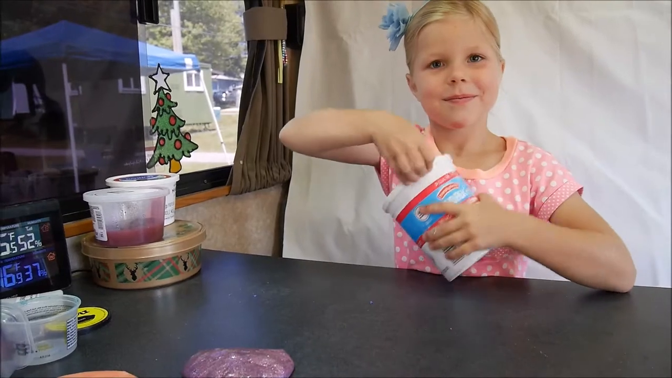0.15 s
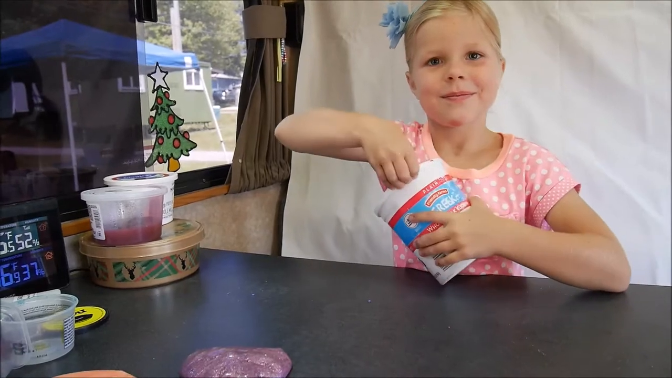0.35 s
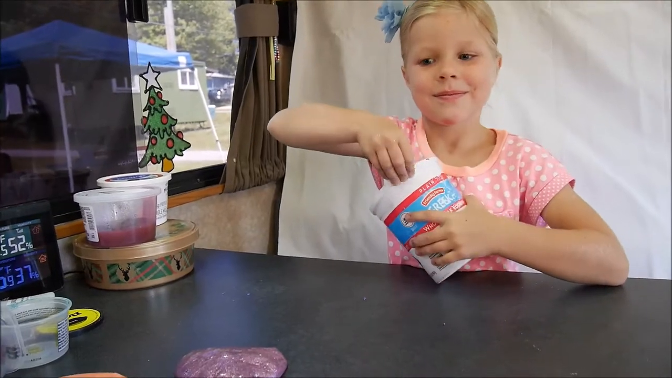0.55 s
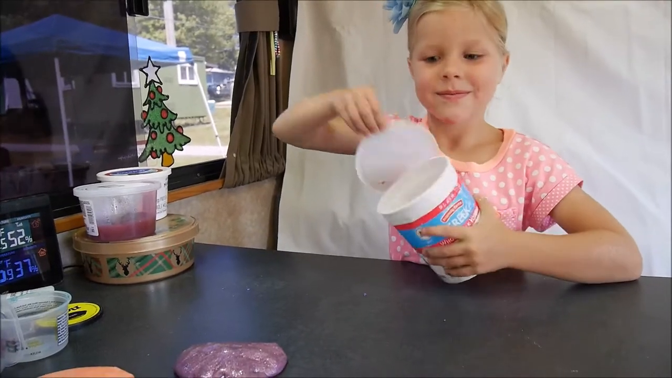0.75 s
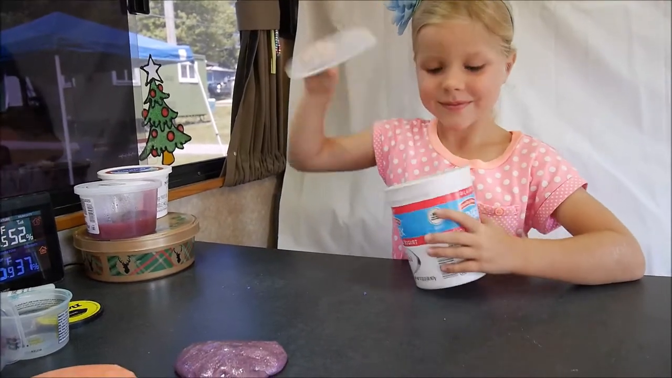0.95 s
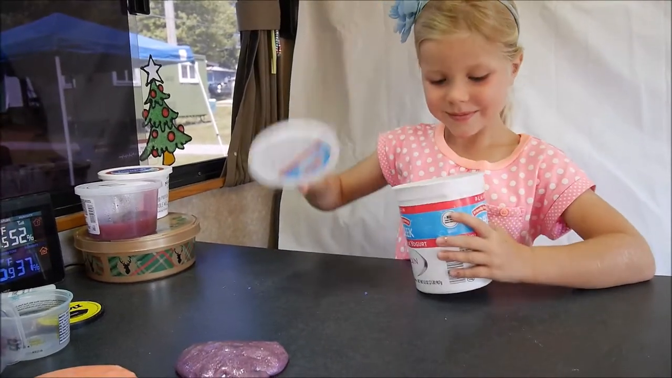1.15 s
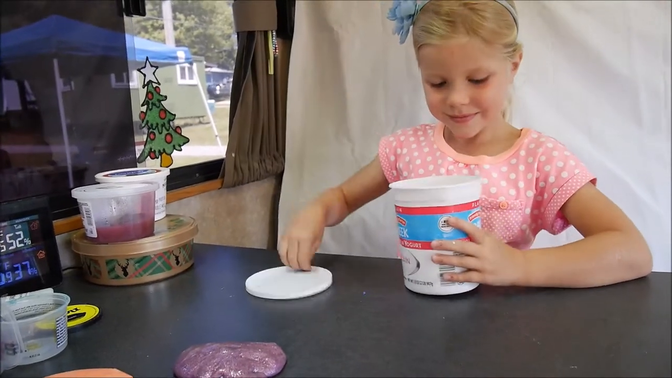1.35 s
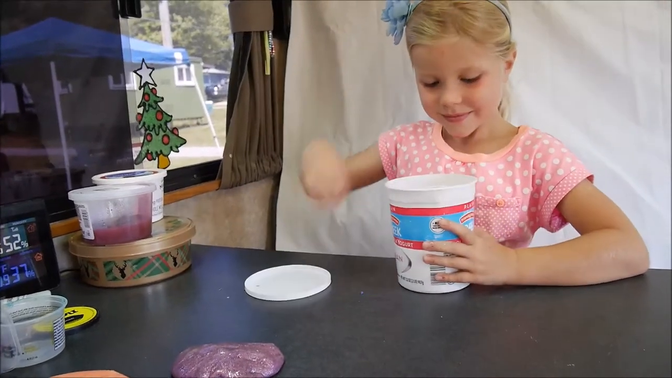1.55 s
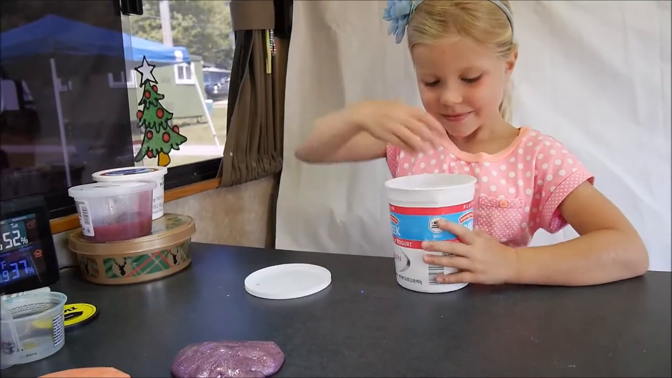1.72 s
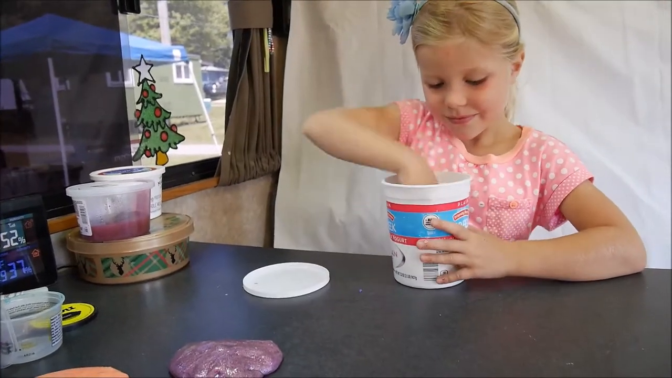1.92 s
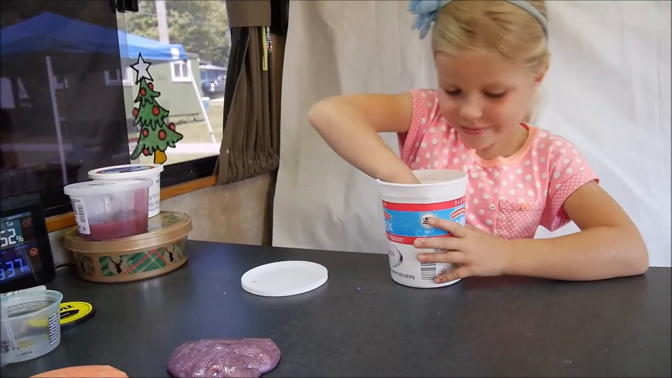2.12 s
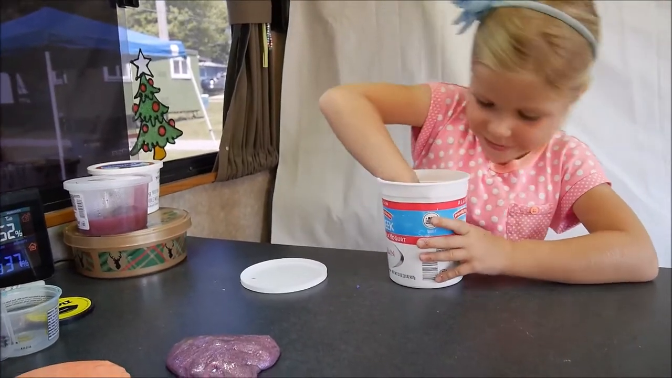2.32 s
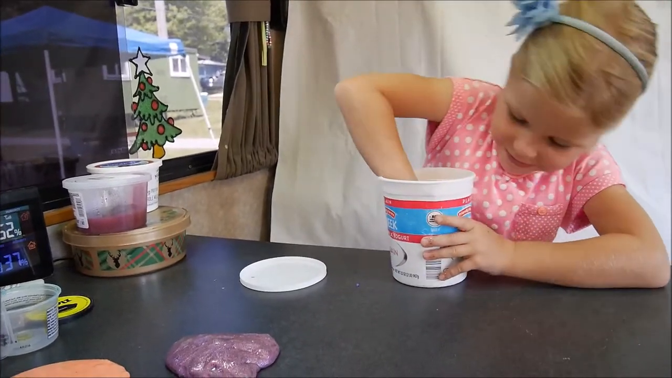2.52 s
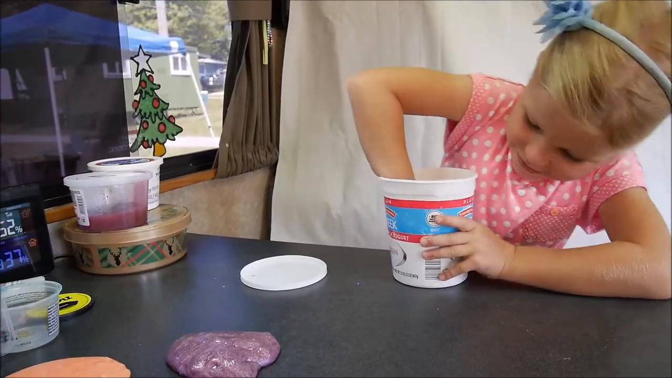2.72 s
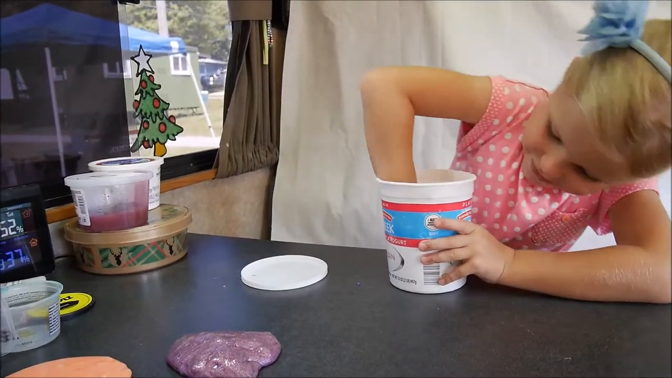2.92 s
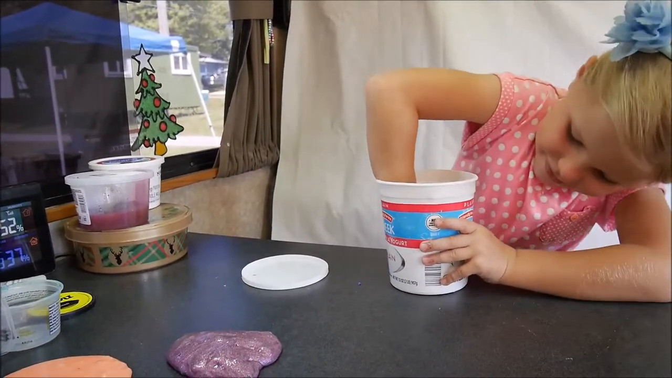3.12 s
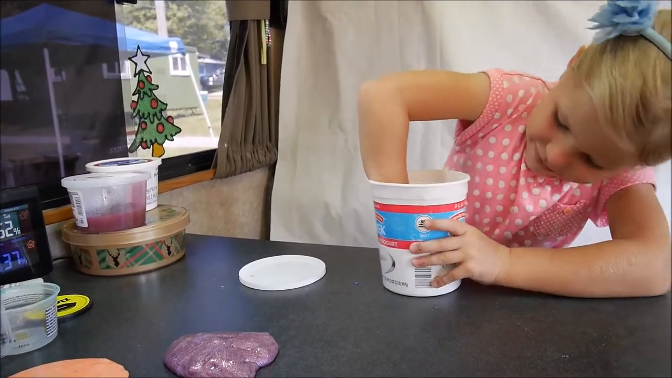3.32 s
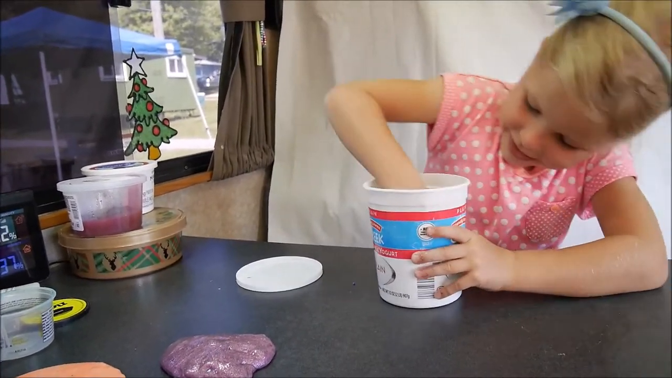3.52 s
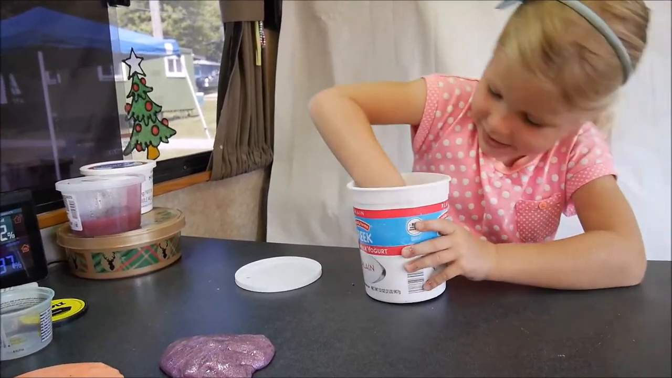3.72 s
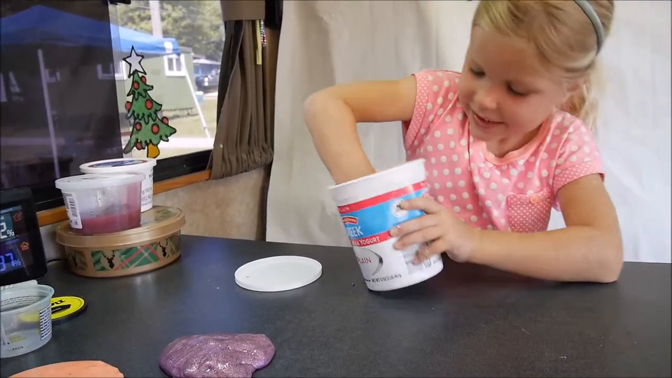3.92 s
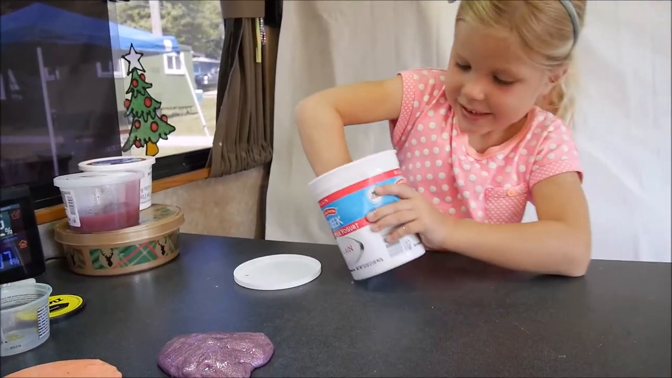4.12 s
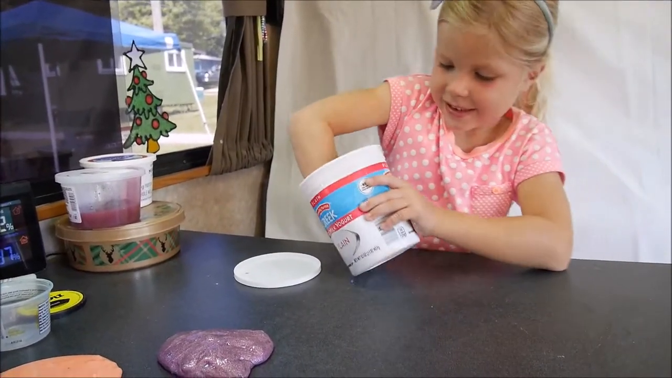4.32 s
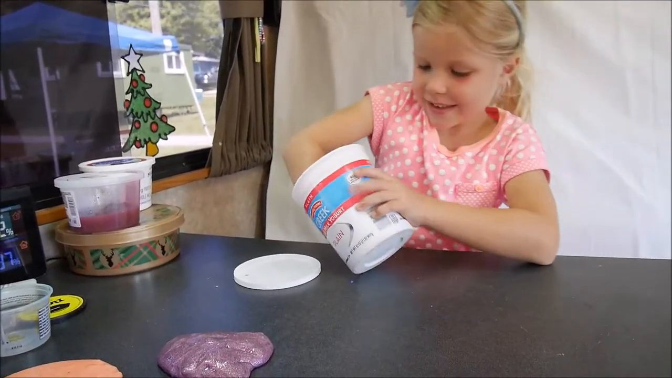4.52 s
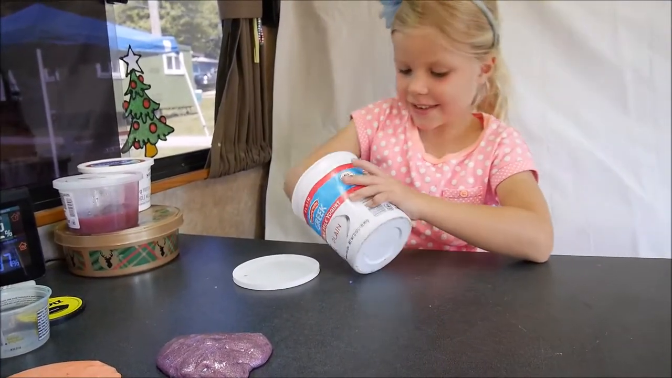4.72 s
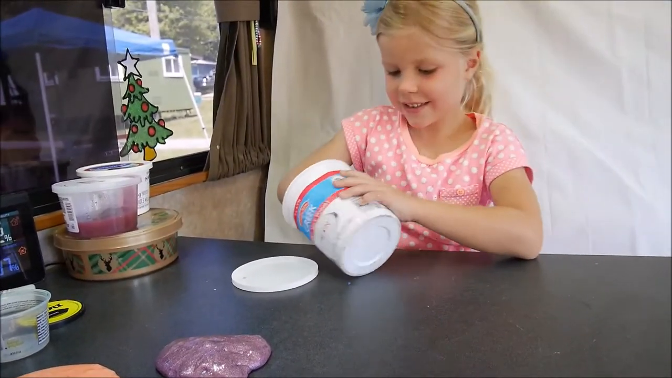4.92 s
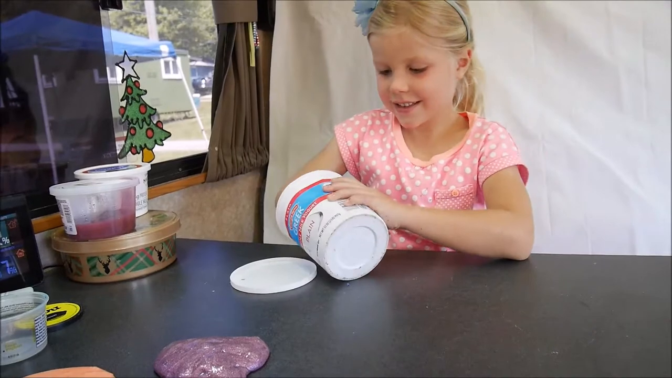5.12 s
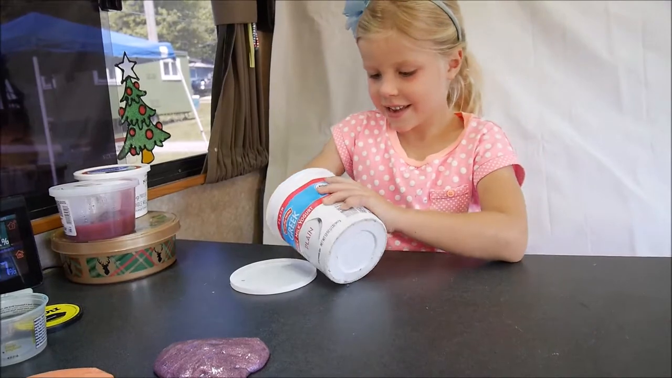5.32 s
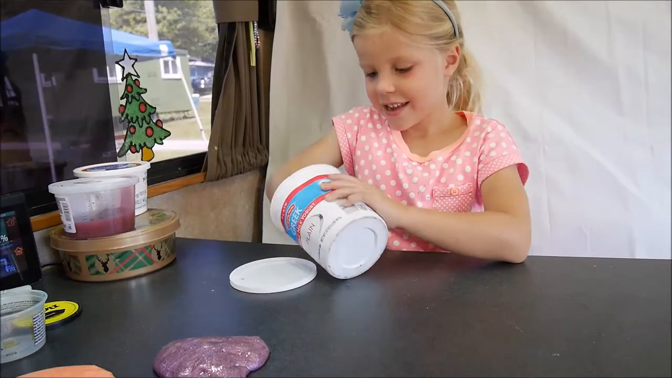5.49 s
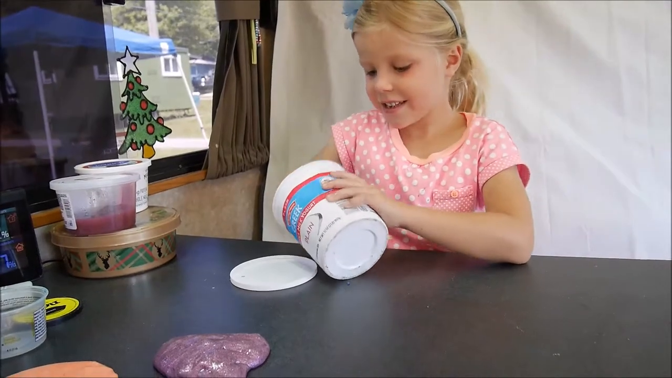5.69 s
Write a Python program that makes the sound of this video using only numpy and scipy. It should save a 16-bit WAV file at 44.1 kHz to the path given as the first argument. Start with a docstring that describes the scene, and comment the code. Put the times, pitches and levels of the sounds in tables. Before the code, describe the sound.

Close, dry indoor handling of a lightweight plastic container: a few loud hollow cracks as the lid is prised loose, a bright flick, a short flat clatter as it lands, then quieter skin-on-plastic rustling, scattered clicks, a dull base knock and short scrapes. A last muffled double knock comes near the end. Faint steady air noise stays underneath, with nearly centred sound and little reverberation.

```python
"""In a small, dead room a thin plastic tub is handled at a table, about a metre from the microphone.
Its lid is prised off in a few snaps, flicks free and drops on the table: damped modes ring under noise cracks.
A hand rubs along the wall in filtered grains of noise, among short bright ticks of resonant noise.
The base scrapes in wandering stick-slip tones, knocks and is tipped over; low bumps are damped sines.
Under it all lies a low ventilation rush of coloured noise."""
import sys
import numpy as np
from scipy import signal
from scipy.fft import rfft, irfft, next_fast_len
from scipy.io import wavfile
from scipy.ndimage import uniform_filter1d

SR = 44100
rng = np.random.default_rng(int(sys.argv[2]) if len(sys.argv) > 2 else 0)


def wrap_up_sound(samples):
    """Save the sound to the file named by the first command line argument, as 16-bit audio."""
    columns = np.atleast_2d(samples).T
    # keep every value between -1 and 1, then stretch to whole-number steps
    tamed = np.clip(columns, -1, 1)
    steps = np.round(tamed * 32767).astype(np.int16)
    wavfile.write(sys.argv[1], SR, steps)


N = 258117
T = np.arange(N) / SR
RING_T = T[:SR // 3]  # time axis of one blow or echo tail [s]

# ventilation spectrum: (frequency [Hz], relative level [dB])
AIR_SPECTRUM = [(15, -32), (25, -50), (75, -29.5), (102, -10), (285, -1.5), (363, -1), (516, -5),
                (560, -15.5), (624, -13.5), (818, -18.5), (962, -23.5), (2480, -33.5), (4370, -34),
                (6380, -40.5), (14400, -45.5), (16000, -63)]
AIR_DB = -45
# side signal of the ventilation: (frequency [Hz], gain [dB])
AIR_SIDE = [(30, 21), (100, -16.5), (400, -20.5), (1000, 5), (3000, 1), (12000, -3.5)]

# side signal of the room's tail: (frequency [Hz], gain [dB])
ROOM_SIDE = [(200, -18), (500, -12), (1000, -7), (3000, -4.5), (12000, -1.5)]
# reflections from the table and near walls: (delay [s], level [dB])
EARLY_ECHOES = [(.0031, -13.5), (.0049, -17.5), (0.0111, -16.5)]
ROOM_T60_S, TOP_HZ = 0.17, 15700

# dull bumps of arm, lid and tub: (time [s], level [dB], frequency [Hz])
BUMPS = [(0.449, -27, 182), (0.705, -29, 157), (1.454, -31, 167), (1.707, -26, 137), (3.331, -29.5, 127),
         (3.571, -28, 148)]

# a fingertip's glide: (start [s], let go [s])
SWISH_S, SWISH_DB = (5.805, 5.85), -37.5

# the base judders over the table: (start [s], end [s], level [dB], ringing frequency [Hz])
BASE_SCRAPES = [(3.448, 3.51, -23, 680), (3.734, 3.787, -38, 658), (5.04, 5.079, -40.5, 634),
                (5.514, 5.561, -31.5, 611.5)]
SCRAPE_CREST = 0.67  # share of its length at which a drag is strongest

# short bright ticks of nails and plastic edges, some of them the sharp edge of a wall snap:
# (time [s], tick level [dB], centre frequency [Hz], wall level [dB])
BRIGHT_TICKS = [(0.037, -33, 3550, -51), (0.7032, -4.5, 4200, -46), (1.087, -25, 3630, -65),
                (1.9226, -47, 11200, -65), (2.200, -36, 9100, -65), (2.682, -32, 2500, -43),
                (2.7745, -16, 2860, -51), (3.0745, -23, 5000, -40.5), (3.29, -33, 6540, -38.5),
                (3.4307, -20, 3500, -37), (4.5242, -32, 2200, -42.5), (4.555, -30.5, 5400, -60),
                (4.5782, -28, 3660, -39), (4.640, -46, 3000, -42), (4.674, -31, 4450, -46),
                (4.751, -13, 6100, -60), (4.8819, -31, 4940, -50), (5.054, -24, 3040, -43),
                (5.1406, -19, 3940, -40), (5.4166, -28.5, 2940, -48)]
# modes in the middle of the wall, rung by a light touch: (frequency [Hz], level [dB], t60 [s])
TOUCH_MODES = [(566, -3, 0.13), (700, 5, 0.052), (970, -3, 0.018), (1075, -9.5, 0.038)]
# fainter ticks at random moments: density, base level, middle frequency, spread either way
STRAY_PER_S, STRAY_DB, STRAY_HZ, STRAY_OCTAVES = 4, -44, 6300, 1

# strokes of skin on plastic: (start [s], let go [s], rub weight [dB], hiss weight relative to rub [dB])
SKIN_STROKES = [(0.934, 1.121, -48.5, -7.5), (1.317, 1.405, -51, -8), (2.04, 2.133, -52, -6),
                (2.23, 2.293, -49.5, -7.5), (2.49, 2.628, -52.5, -12), (2.798, 2.876, -41, -11.5),
                (2.86, 3.05, -41.5, -10), (3.149, 3.36, -47.5, -6.5), (3.387, 3.456, -40, -8),
                (3.412, 3.486, -34.5, -4), (3.568, 3.623, -43, -3), (3.642, 3.768, -38.5, -1.5),
                (3.957, 4.027, -43.5, -10), (4.026, 4.224, -48.5, -7), (4.56, 4.744, -52, -6),
                (4.89, 4.966, -50, -9.5), (5.024, 5.057, -39, -9), (5.11, 5.142, -46.5, -9),
                (5.282, 5.343, -49, -16), (5.425, 5.52, -50, -14), (5.502, 5.541, -39.5, -5.5),
                (5.815, 5.86, -44, -6)]
# brushing between strokes: (start [s], end [s], rub weight [dB], hiss weight relative to rub [dB])
HAND_BRUSH = (1.06, 6.5, -62.5, -3.5)
# linear press-in time, easing during the slide, time constant of the lift
PRESS_S, EASE_DB_PER_S, LIFT_S = 0.039, 7, 0.026
# the rub as coloured by the tub: (frequency [Hz], gain [dB])
RUB_SPECTRUM = [(250, -10.5), (500, 8.5), (680, 15.5), (950, 8.5), (1300, -4), (1700, 0), (2200, 0),
                (2700, 0), (3700, -2.5), (4800, -6), (6500, -7), (10000, -24)]
# the fine hiss of skin: (frequency [Hz], gain [dB])
HISS_SPECTRUM = [(3000, -30), (5500, -26), (6800, -33), (7900, 9), (9500, 21.5), (12000, 16), (14500, 10),
                 (16000, -52)]

# the base knocks on the table: (time [s], ring level [dB], contact cutoff [Hz],
# pitch factor [ratio], crack level [dB], crack tilt [dB/octave])
BASE_KNOCKS = [(3.3295, -35, 690, 1.16, -35.5, 5), (3.5708, -12.5, 690, 0.99, -28, -1.5),
               (3.7205, -29.5, 1200, 1.04, -32.5, 8.5), (5.6935, -20.5, 2550, 1.29, -16.5, -8.5)]
# modes of the base: (frequency [Hz], level [dB], t60 [s])
BASE_MODES = [(229, -4, 0.036), (330, -8, 0.072), (362, -7, 0.071), (564, 7, 0.031), (703, -5, 0.052),
              (780, -13, 0.12), (880, 0.5, 0.02), (1087, -3, 0.021), (1620, -47, 0.019), (1870, -11, 0.055),
              (2284, 3, 0.014), (3000, -25, 0.015)]
# the loose lid is struck: (time [s], ring level [dB], contact cutoff [Hz],
# pitch factor [ratio], crack level [dB], crack tilt [dB/octave])
LID_STRIKES = [(0.9142, -31, 5000, 1.1, -21, 4), (0.9238, -25.5, 9000, 1.16, -11, 1.5),
               (1.4201, -11, 6000, 1.0, -13, -3.5), (1.4250, -23.5, 5000, 1.0, -18.5, 6),
               (1.4490, -29, 4000, 0.83, -15.5, -5), (1.4522, -23, 5000, 1.2, -16.5, -2),
               (1.4580, -24.5, 5000, 1.0, -26, 5.5), (1.9845, -48.5, 3500, 0.91, -33.5, -3)]
# modes of the lid: (frequency [Hz], level [dB], t60 [s])
LID_MODES = [(222, -17, 0.12), (362, -8.5, 0.015), (488, -12, 0.048), (724, -10.5, 0.037), (940, -4, 0.015),
             (1636, -1, 0.014), (2170, -4, 0.042), (2420, -12, 0.019), (3200, -9.5, 0.035),
             (3430, -9, 0.054), (3690, -3, 0.033), (4220, -20, .035), (4800, -16, 0.027),
             (7360, -37, 0.022)]
# dense upper modes that crack in lid and base: (frequency [Hz], gain [dB])
LID_AND_BASE_CRACK = [(300, -11), (1000, -12.5), (1800, -10), (2800, 7), (3800, 7), (5000, 0.5),
                      (6500, -2.5), (8000, -5.5), (10000, -4.5), (13000, -8), (16000, -22)]
# the tub wall and rim snap: (time [s], wall level [dB], contact cutoff [Hz],
# pitch factor of the grip [ratio], crack level [dB], crack tilt [dB/octave])
WALL_SNAPS = [(0.2243, -26.5, 980, 0.96, -25.5, -6), (0.3252, -38, 700, 0.95, -28, -4),
              (0.4411, -8.5, 1190, 0.98, -7, 1), (0.4432, -16, 1180, 1.06, -26.5, -10.5),
              (0.4520, -7.5, 523, 0.96, -16, -6), (0.6715, -29.5, 694, 1.07, -41.5, -1),
              (0.7029, -14, 1510, 1.07, -11.5, 0.5), (0.7075, -16, 890, 1.12, -21, -5),
              (0.7185, -17, 674, 1, -28, -8), (0.7330, -19, 507, 1.03, -19.5, -5.5),
              (0.8850, -26, 800, 0.807, -19, -3), (0.9150, -33.5, 406, 0.72, -21, -4),
              (2.7735, -28, 700, 1.2, -17.5, -4), (4.7490, -54, 900, 1.2, -21, 1.5),
              (4.7530, -34, 900, 1.4, -20.5, -1.5), (5.6735, -19, 395, 1.03, -35, -0.5),
              (5.6925, -25, 290, 0.92, -25, -9.5)]
# modes of the wall: (frequency [Hz], level [dB], t60 [s])
WALL_MODES = [(217, -14.5, 0.071), (279, -3, 0.087), (318, -1.5, 0.033), (473, 3.5, 0.049),
              (539.4, -9, 0.15), (732, -8, 0.048), (890, -3, 0.032), (980, -5, 0.068), (1182, -18.5, 0.054),
              (1650, -12.5, 0.031)]
# dense upper modes that crack in the rim: (frequency [Hz], gain [dB])
RIM_CRACK_SPECTRUM = [(300, 8), (1000, 3), (1600, -2.5), (2200, -0.5), (3400, 1.5), (4350, 3.5),
                      (5400, 0.5), (6400, 0.5), (7800, -6), (9200, -1), (11500, -6.5), (14500, -14),
                      (16000, -33)]


def undb(db):
    """Level: an amplitude gain is ten to the power of decibels over twenty."""
    return 10 ** (np.asarray(db) / 20)


def unit(x):
    """Normalization: a signal divided by its rms has rms 1."""
    return x / np.sqrt(np.mean(x ** 2))


def add(track, s, sound):
    """Superposition: pressures sum, here from time s onward."""
    i = int(s * SR)
    track[i:i + len(sound)] += sound[:len(track) - i]


def colour(x, points, tilt_db=0):
    """Minimum phase: a magnitude curve, tilted about 4 kHz, fixes a causal filter through its cepstrum."""
    size = 2 * next_fast_len(len(x))
    octave = np.log2(np.maximum(np.fft.rfftfreq(size, 1 / SR), 20))
    hz, db = np.transpose(points)
    curve_db = np.interp(octave, np.log2(hz), db)
    # the tilt stays constant below 1 kHz
    tilt = tilt_db * np.maximum(octave - np.log2(4000), -2)
    cepstrum = irfft(np.log(undb(curve_db + tilt)))
    # folding the negative times onto the positive ones makes the filter causal
    cepstrum[1:size // 2] *= 2
    cepstrum[size // 2 + 1:] = 0
    return irfft(rfft(x, size) * np.exp(rfft(cepstrum)))[:len(x)]


def resonate(x, hz, width_hz):
    """Resonance: a single damped mode passes a band about its centre, where its gain is 1."""
    b, a = signal.iirpeak(min(hz, .45 * SR), hz / width_hz, fs=SR)
    return signal.lfilter(b, a, x)


def fade(t60):
    """Damping: free vibration decays exponentially, by 60 dB in t60 seconds."""
    return undb(-60 * RING_T / t60)


def burst(t60):
    """Modal overlap: many modes too close to tell apart act as decaying noise."""
    return rng.standard_normal(len(RING_T)) * fade(t60)


def walk(rate):
    """Random modulation: smoothed random steps vary slowly, with rms 1."""
    k = int(SR / rate)
    steps = np.repeat(rng.standard_normal(N // k + 1), k)
    return unit(uniform_filter1d(steps, k)[:N])


def grains(rate, spread_db):
    """Stick-slip friction: tiny slips of uneven size fall at random moments, rate per second."""
    moments = rng.random(N) < rate / SR
    return moments * rng.standard_normal(N) * undb(spread_db * rng.standard_normal(N))


def stereo(mid, side, width):
    """Sum and difference: an independent, coloured side signal sets the width at each frequency."""
    side = colour(side, width)
    return np.array([mid + side, mid - side])


def ventilation():
    """Flow noise: turbulence gives a steady low rush, with a broad hum and a fainter low drone."""
    mid, side = (unit(colour(rng.standard_normal(N), AIR_SPECTRUM)) for _ in range(2))
    rush = undb(AIR_DB) * stereo(mid, side, AIR_SIDE)
    hum = undb(-49.5) * unit(resonate(rng.standard_normal(N), hz=331.6, width_hz=15.0))
    drone = undb(-62) * unit(resonate(rng.standard_normal(N), hz=110, width_hz=22))
    return rush + hum + drone


def room(x, low_db, high_db, pan_db):
    """Reverberation: direct sound and early echoes precede a short diffuse tail, new at every call."""
    early = np.zeros(len(RING_T))
    early[0] = 1  # direct sound
    for s, db in EARLY_ECHOES:
        add(early, s, undb([db]))
    build_up = np.clip(RING_T / 0.00093 - .5, 0, 1)
    tails = [burst(ROOM_T60_S) * build_up for _ in range(2)]
    tail_curve = [(500, low_db), (2000, high_db)]
    mid, side = (colour(tail / np.linalg.norm(tail), tail_curve) for tail in tails)
    response = early + stereo(mid, side, ROOM_SIDE)
    pan = undb([[-pan_db / 2], [pan_db / 2]])  # positive leans right
    return signal.fftconvolve(x[None], response, axes=1)[:, :N] * pan


def thuds():
    """Damped oscillation: each bump gives a few low, quickly dying swings."""
    out = np.zeros(N)
    onset = 1 - np.exp(-RING_T / 0.0059)
    for s, db, hz in BUMPS:
        swing = np.sin(2 * np.pi * hz * RING_T) * fade(t60=0.079) * onset
        add(out, s, undb(db) * swing)
    return out


def stroke(start, let_go):
    """Contact force: a stroke presses in, eases as it slides and lifts off exponentially."""
    press = np.clip((T - start) / PRESS_S, 0, 1)
    ease = undb(-EASE_DB_PER_S * np.clip(T - start, 0, let_go - start))
    lift = np.exp(-np.maximum(T - let_go, 0) / LIFT_S)
    return press * ease * lift


def swish():
    """Sliding friction: a fingertip gliding over the smooth wall excites a thin, high hiss."""
    hiss = unit(resonate(rng.standard_normal(N), hz=11200, width_hz=4300))
    return undb(SWISH_DB) * stroke(*SWISH_S) * hiss


def scrapes():
    """Stick-slip: as the tub is dragged, the slips lock loosely to the base's drum mode."""
    out = np.zeros(N)
    for start, end, db, hz in BASE_SCRAPES:
        drag = np.interp((T - start) / (end - start), [0, SCRAPE_CREST, 1], [0, 1, 0])
        pressure = drag * undb(2 * walk(rate=90))
        phase = 2 * np.pi * np.cumsum(hz * (1 + 0.037 * walk(rate=210))) / SR
        # sudden slips add overtones
        judder = np.sin(phase) + 0.01 * np.sin(2 * phase) + 0.042 * np.sin(3 * phase)
        grit = unit(resonate(grains(rate=820, spread_db=5), hz, width_hz=76))
        out += undb(db) * pressure * (judder + .55 * grit)
    return out


def ringing(modes, contact_hz, grip):
    """Modal synthesis: a soft contact leaves high modes out; a tight grip raises every frequency."""
    hz, db, t60 = np.transpose(modes)
    gains = undb(db) / np.hypot(1, (hz * grip / contact_hz) ** 2)
    out = np.zeros(len(RING_T))
    for k, (gain, f, decay) in enumerate(zip(gains, hz, t60)):
        sign = (-1) ** k  # neighbouring modes move the radiating face in opposite directions
        out += sign * gain * np.sin(2 * np.pi * f * grip * RING_T) * fade(decay)
    return out


def tick(hz):
    """Impulsive excitation: a short burst of noise, coloured by one broad resonance, makes a bright click."""
    return resonate(burst(t60=0.0067), hz, .5 * hz)


def ticks():
    """Light impact: nails, edges and snaps tick with a little wall ring; faint stray ticks join the brushing."""
    out = np.zeros(N)
    for s, db, hz, wall_db in BRIGHT_TICKS:
        grip = 1 + 0.013 * rng.standard_normal()
        add(out, s, undb(db) * tick(hz) + undb(wall_db) * ringing(TOUCH_MODES, 2000, grip))
    start, end = HAND_BRUSH[:2]
    for when, spot, force in rng.random((int(STRAY_PER_S * (end - start)), 3)):
        s = min(start + when * (end - start), T[-1])
        hz = STRAY_HZ * 2 ** (STRAY_OCTAVES * (2 * spot - 1))
        add(out, s, undb(STRAY_DB) * (.5 + force) * tick(hz))
    return out


def wander(x, depth_db):
    """Moving excitation: as the contact shifts, each broad wall resonance comes and goes."""
    out = np.zeros(N)
    for hz in np.geomspace(600, 7000, 9):
        out += undb(depth_db * walk(rate=40)) * resonate(x, hz, hz / 3)
    return unit(out)


def hand():
    """Friction: skin catches and slips on the wall, sounding the tub's colour and a finer hiss."""
    start, end, brush_db, brush_hiss_db = HAND_BRUSH
    rub = undb(brush_db) * np.clip(np.minimum(T - start, end - T) / PRESS_S, 0, 1)
    hiss = rub * undb(brush_hiss_db)
    for start, let_go, db, hiss_db in SKIN_STROKES:
        pressure = undb(db) * stroke(start, let_go)
        # overlapping strokes add in power
        rub = np.hypot(rub, pressure)
        hiss = np.hypot(hiss, pressure * undb(hiss_db))
    slips = unit(grains(rate=3000, spread_db=1.5)) * undb(2.2 * walk(rate=70))
    slips = slips + undb(-6.0) * unit(grains(rate=160, spread_db=2.0))  # a few larger catches crackle
    rub_sound = rub * unit(colour(wander(slips, depth_db=5.5), RUB_SPECTRUM))
    hiss_sound = hiss * unit(colour(slips, HISS_SPECTRUM))
    return undb(1.0) * rub_sound + undb(-9.0) * hiss_sound


def blows(events, modes, crack_colour, crack_t60, choke_t60, swell_share):
    """Struck body: each blow rings and cracks; the next contact damps the ring that remains."""
    out = np.zeros(N)
    next_blow = [row[0] for row in events[1:]] + [T[-1]]
    # a crack is a short slide of plastic, so it swells before it dies
    swell = 1 - np.exp(-RING_T / (swell_share * crack_t60))
    for (s, ring_db, contact_hz, grip, crack_db, tilt_db), later in zip(events, next_blow):
        choke = undb(-60 * np.maximum(RING_T - (later - s), 0) / choke_t60)
        ring = choke * ringing(modes, contact_hz, grip)
        crack = colour(burst(crack_t60) * swell, crack_colour, tilt_db)
        add(out, s, undb(ring_db) * ring + undb(crack_db) * crack)
    return out


def knocks():
    """Plate impact: the base meets the table and its modes ring."""
    return blows(BASE_KNOCKS, BASE_MODES, LID_AND_BASE_CRACK,
                 crack_t60=0.02, choke_t60=.1, swell_share=0.0053)


def lid_hits():
    """Plate impact: the loose lid is struck and rings in brief, bright modes."""
    return blows(LID_STRIKES, LID_MODES, LID_AND_BASE_CRACK,
                 crack_t60=0.028, choke_t60=0.028, swell_share=0.025)


def snaps():
    """Sudden release: wall and rim snap, ringing the wall's modes under a crack."""
    return blows(WALL_SNAPS, WALL_MODES, RIM_CRACK_SPECTRUM,
                 crack_t60=0.021, choke_t60=0.078, swell_share=0.035)


def scene():
    """Superposition: ventilation, bumps, handling, base, lid and tub wall sum at the microphone."""
    handling = room(ticks() + hand() + scrapes() + swish(), low_db=-10, high_db=-0.5, pan_db=0.7)
    base = room(knocks(), low_db=-6, high_db=-3.5, pan_db=0.5)
    lid = room(lid_hits(), low_db=-5.5, high_db=-4, pan_db=1.0)
    wall = room(snaps(), low_db=-18, high_db=-3, pan_db=0.8)
    # thin, small plastic radiates almost no bass
    bass_cut = signal.butter(3, 160, "high", fs=SR, output="sos")
    plastic = signal.sosfilt(bass_cut, wall + lid + base + handling)
    return plastic + thuds() + ventilation()


def record(dry):
    """Band limitation: the recorder cuts the top with a steep elliptic low-pass."""
    top_cut = signal.ellip(8, .2, 70, TOP_HZ, fs=SR, output="sos")
    return signal.sosfilt(top_cut, dry)


dry = scene()
out = record(dry)
wrap_up_sound(out)
```